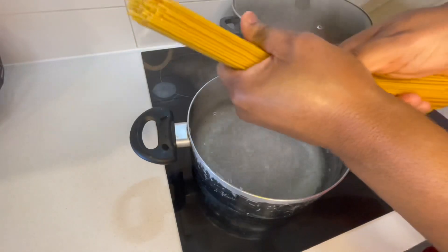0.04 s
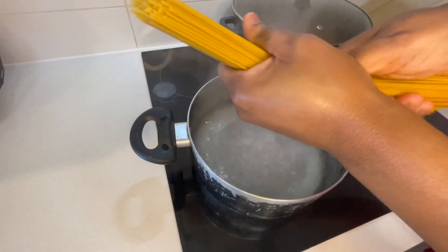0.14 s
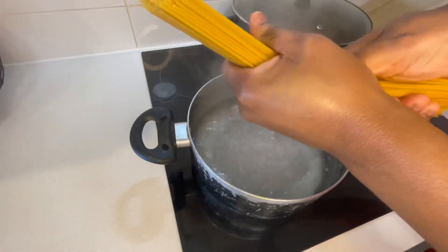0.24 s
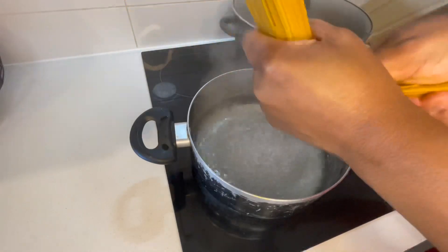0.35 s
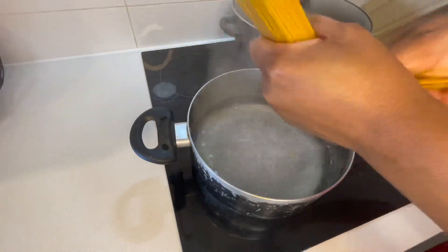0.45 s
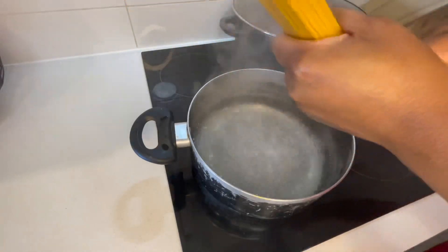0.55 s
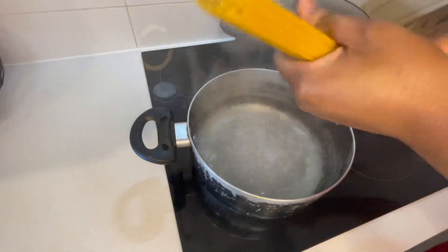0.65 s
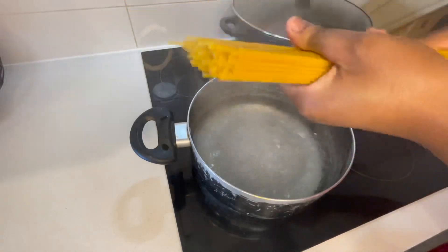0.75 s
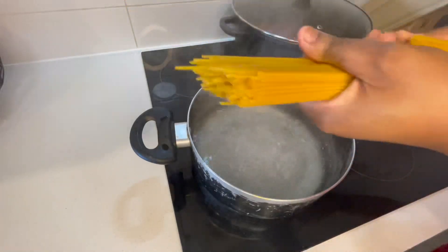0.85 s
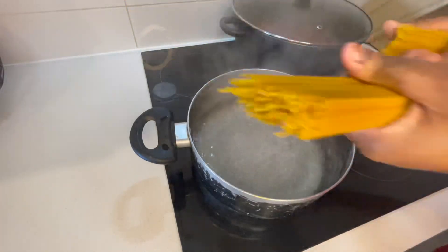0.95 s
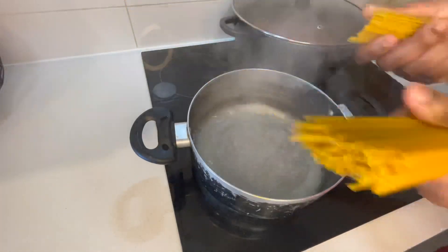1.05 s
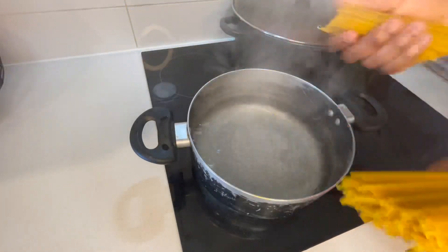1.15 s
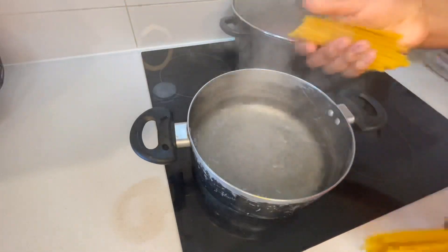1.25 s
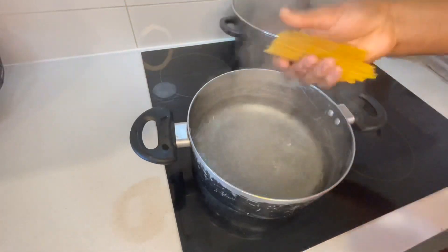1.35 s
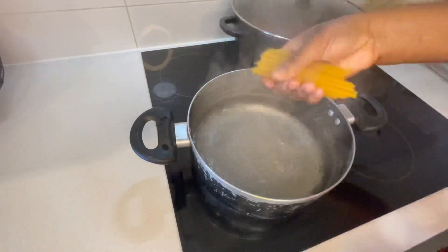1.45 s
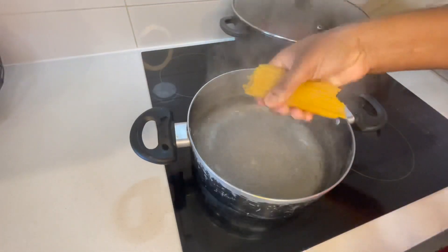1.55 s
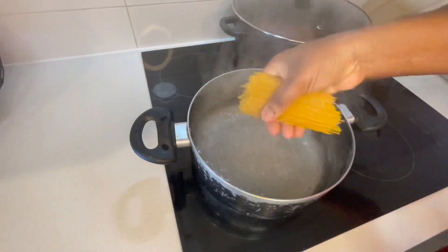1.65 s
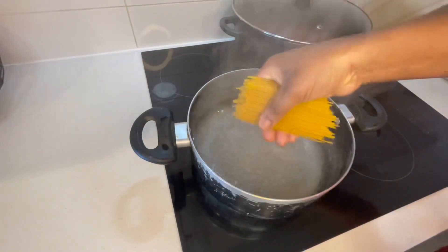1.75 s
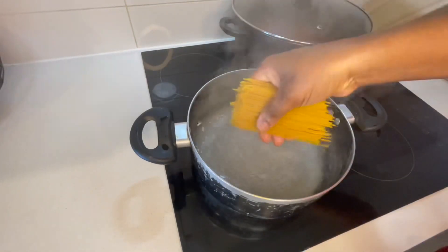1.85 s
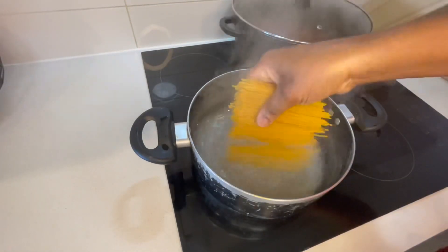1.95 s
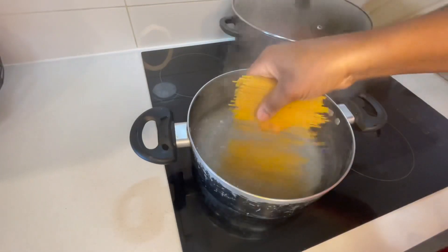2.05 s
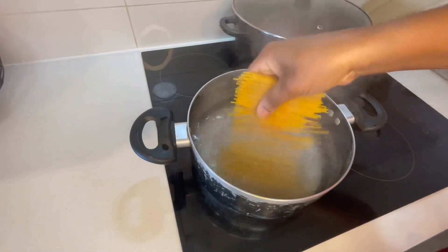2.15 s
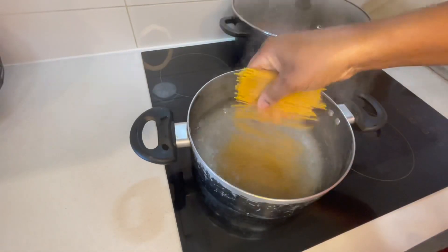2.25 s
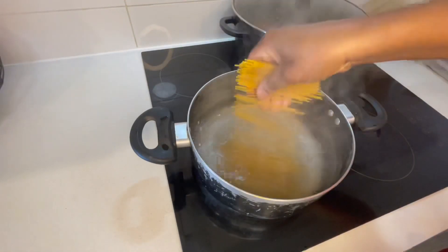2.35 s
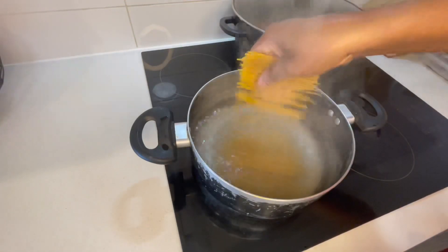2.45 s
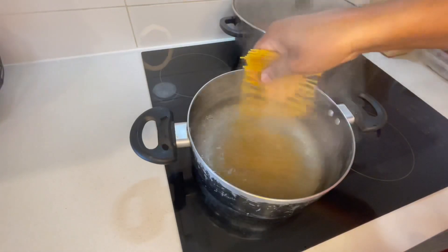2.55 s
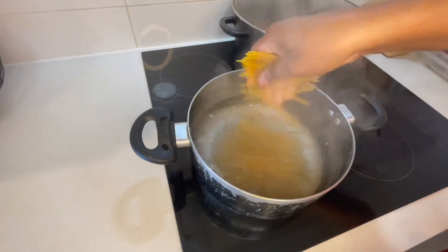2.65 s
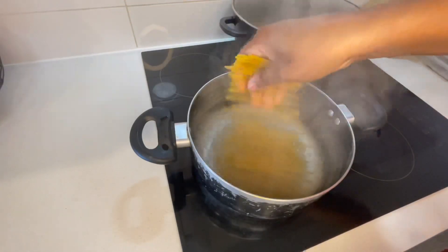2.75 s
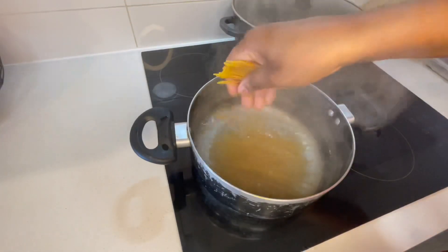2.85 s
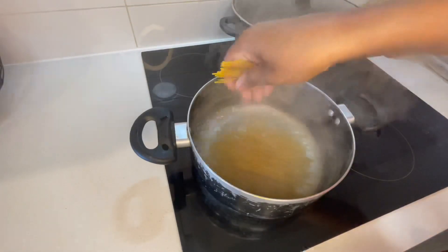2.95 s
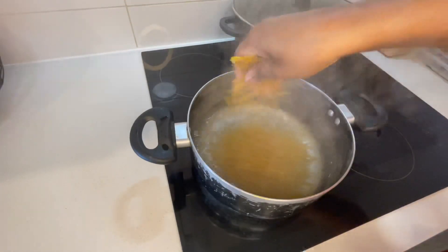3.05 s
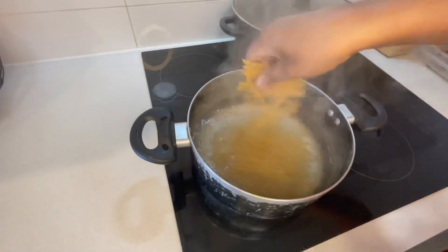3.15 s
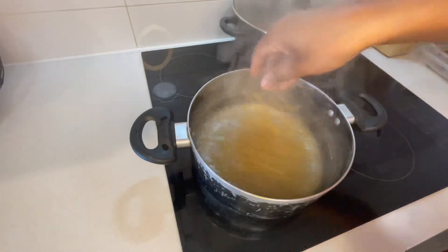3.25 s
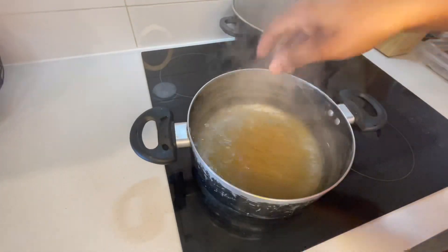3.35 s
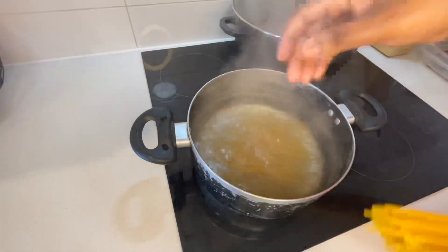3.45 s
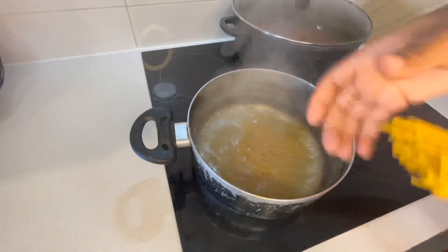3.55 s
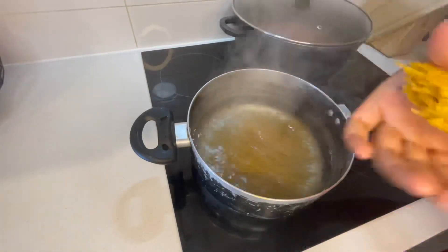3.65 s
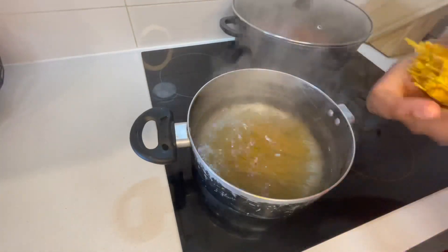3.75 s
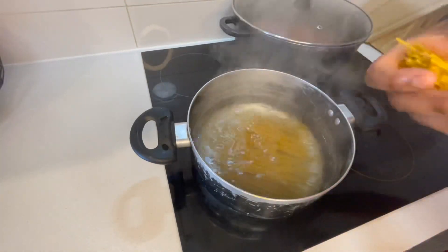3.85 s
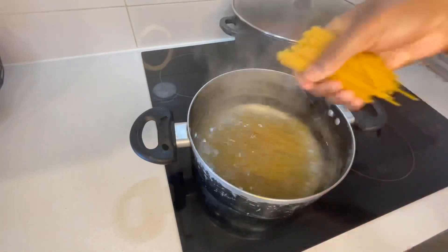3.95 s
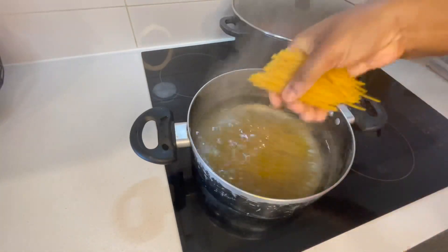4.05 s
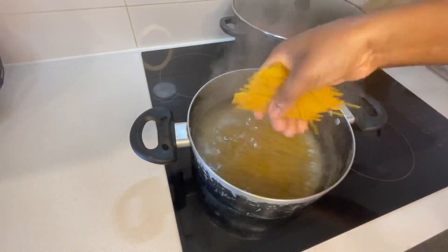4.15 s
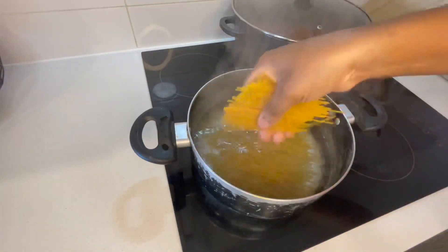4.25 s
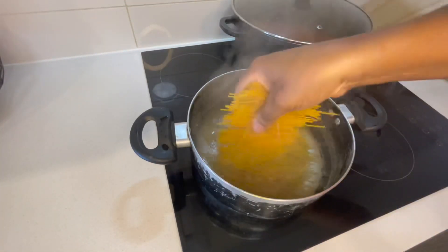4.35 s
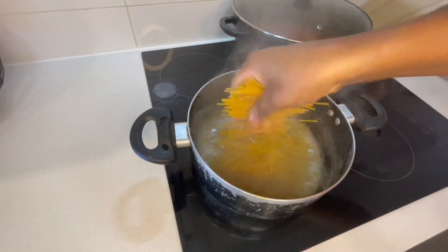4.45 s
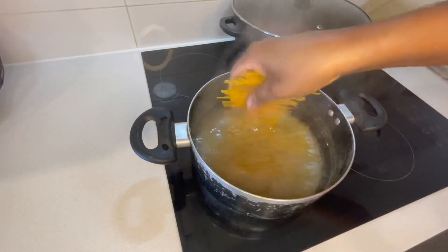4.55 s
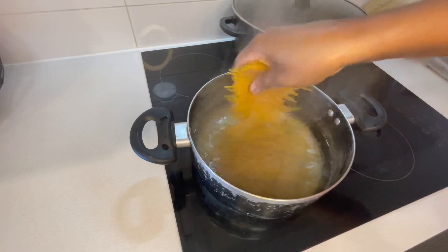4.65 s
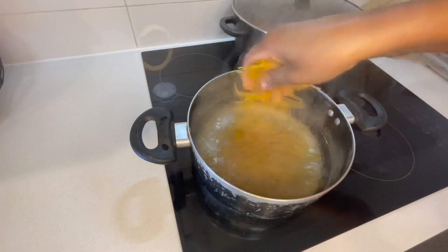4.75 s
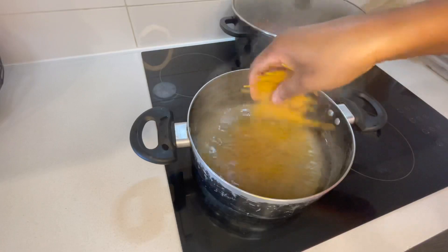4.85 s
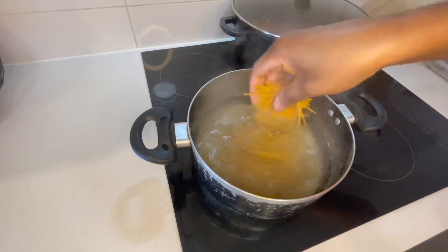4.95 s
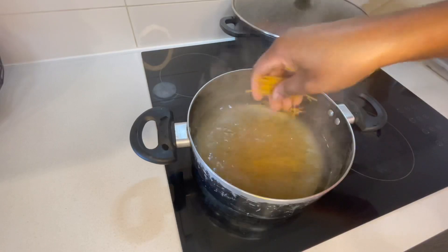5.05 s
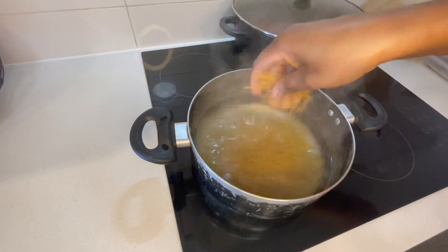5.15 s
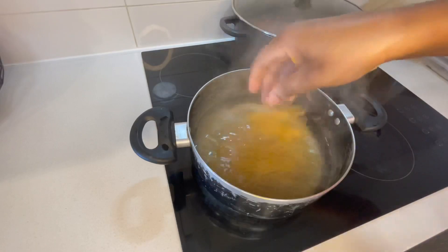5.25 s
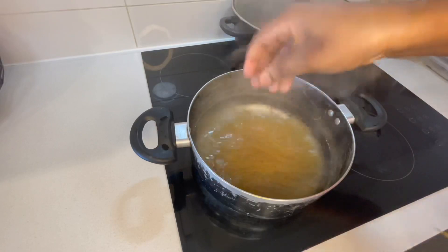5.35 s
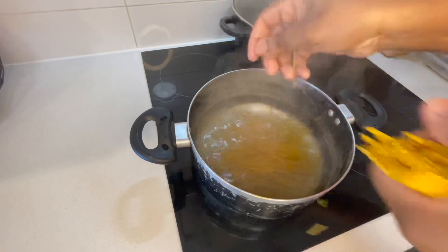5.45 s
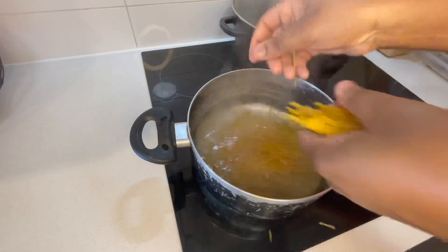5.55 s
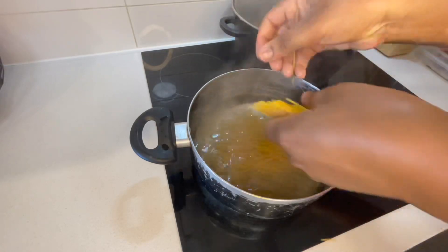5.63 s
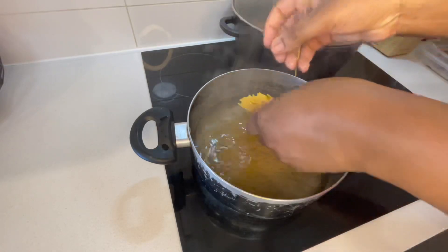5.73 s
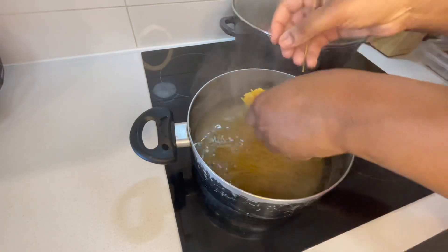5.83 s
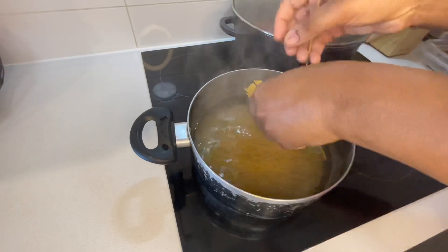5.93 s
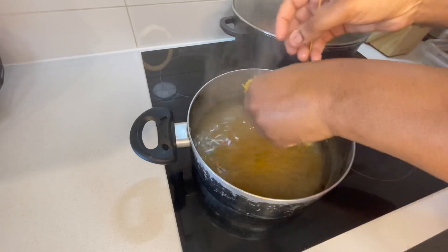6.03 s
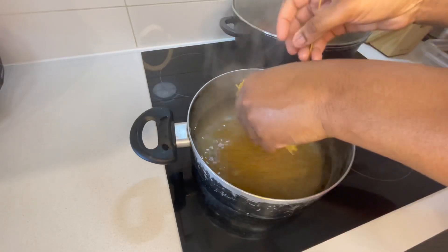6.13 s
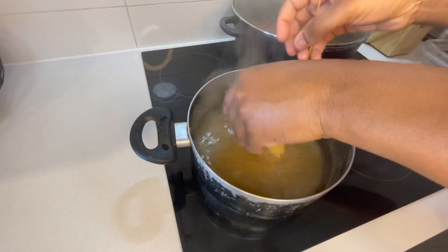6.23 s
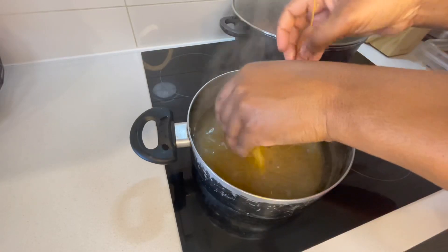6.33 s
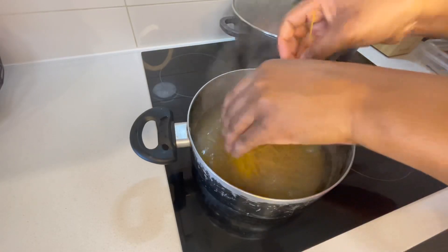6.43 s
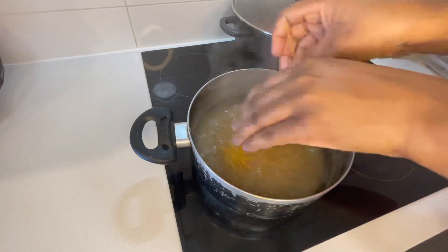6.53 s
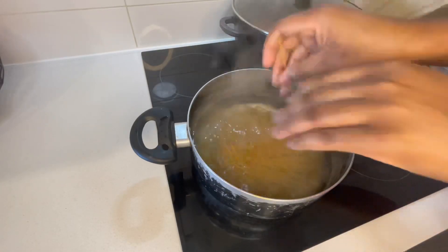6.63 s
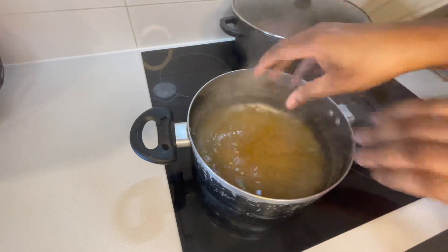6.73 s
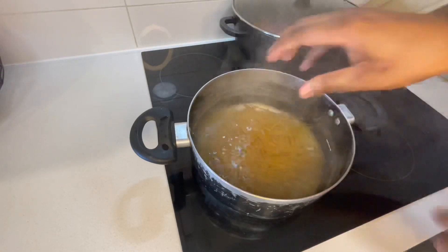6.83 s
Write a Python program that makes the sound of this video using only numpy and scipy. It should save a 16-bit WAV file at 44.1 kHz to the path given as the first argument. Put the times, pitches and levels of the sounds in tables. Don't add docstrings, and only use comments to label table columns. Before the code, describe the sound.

Close stereo in a small hard-walled kitchen: a bundle of dry spaghetti breaks at once in a loud, woody, brittle volley. After a quiet second of small ticks and steam, handfuls slide into a simmering pot, rustling, rattling and pattering on water in three waves. Falling strands stir up the soft bubbling and fizz. A faint low fan hum runs underneath.

```python
import sys
import numpy as np
from scipy import signal
from scipy.fft import rfft, irfft, next_fast_len
from scipy.io import wavfile
from scipy.ndimage import uniform_filter1d

SR = 44100
rng = np.random.default_rng(int(sys.argv[2]) if len(sys.argv) > 2 else 0)


def master(y):
    cut = np.clip(np.atleast_2d(y).T, -1, 1)
    pcm = np.round(cut * 32767)
    wavfile.write(sys.argv[1], SR, pcm.astype(np.int16))


def magnitude_from_level(level_db):
    exponent = np.asarray(level_db, float) / 20
    return 10 ** exponent


N = 303849
FLAT_ABOVE_HZ = 12000

# f/Hz, level/dB
STRAND_SIDE_DB = [(60, -14), (110, -22), (200, 4), (380, -2.5), (700, -7), (1290, -3), (2380, -7.5),
                  (4400, 1), (8120, -3.5), (15000, -1.5)]
# f/Hz, level/dB
AIR_SIDE_DB = [(60, -12), (110, -27), (200, -6), (380, -4), (700, -2.5), (1290, 0), (2380, 0), (4400, -0.5),
               (8120, -3), (15000, 2)]


def from_db(db):
    return np.exp(db * (np.log(10) / 20))


def rms_one(x):
    return x / np.sqrt(np.mean(x ** 2) + 1e-20)


def in_time(rows):
    s, *columns = np.transpose(rows)
    return [np.interp(np.arange(N) / SR, s, c) for c in columns]


def at_hz(points, hz):
    points = np.array(points)
    return np.interp(np.log(hz), np.log(np.maximum(points[:, 0], 1)), points[:, 1])


def drift(rate_hz, size=N):
    r = np.exp(-80 * np.pi * rate_hz / SR)
    white = rng.standard_normal(N // 40 + 2002)
    slow = signal.lfilter([1], [1, -2 * r, r * r], white)[2000:]
    return np.interp(np.arange(size) / 40, np.arange(len(slow)), rms_one(slow))


def resonate(x, hz, width_hz):
    r = np.exp(-np.pi * width_hz / SR)
    b = (1 - r * r) / 2
    return signal.lfilter([b, 0, -b], [1, -2 * r * np.cos(2 * np.pi * hz / SR), r * r], x)


def ports(mid, side):
    return np.array([mid + side, mid - side])


def lead(pair, shares):
    length = pair.shape[1]
    size = next_fast_len(length)
    share = at_hz(shares, np.maximum(np.fft.rfftfreq(size, 1 / SR), 1))
    early = irfft(1j * share * rfft(pair.mean(axis=0), size), size)[:length]
    return pair + ports(0 * early, early)


def coloured(spectrum, side_db):
    size = next_fast_len(N)
    hz = np.maximum(np.fft.rfftfreq(size, 1 / SR), 1)
    shape = magnitude_from_level(at_hz(spectrum, np.minimum(hz, FLAT_ABOVE_HZ))) * magnitude_from_level([0 * hz, at_hz(side_db, hz)])
    mid, side = irfft(rfft(rng.standard_normal((2, size))) * shape, size)[:, :N]
    return ports(mid, side) / np.std(mid)


def strands(spectrum, level_db, ring_db, low_db, per_s, spread_db, clump_db, cycles):
    size = len(level_db)
    hit = rng.random(size) < per_s / SR
    sizes = magnitude_from_level(spread_db * np.minimum(rng.exponential(1, size), 4)) * hit
    signs = rng.choice([-1., 1.], (2, size))
    dealt = rng.integers(0, 24, size)
    hz_all = np.geomspace(400, 15300, num=24)
    weight = magnitude_from_level(at_hz(spectrum, np.minimum(hz_all, FLAT_ABOVE_HZ))) * np.sqrt(hz_all)
    weight = weight / np.sqrt(np.sum(weight[hz_all > 4000] ** 2))
    out, clump = 0, drift(22.0, size=size)
    for k, hz in enumerate(hz_all):
        hits = sizes * signs * (dealt == k) + 1e-18
        mid, side = rms_one(resonate(resonate(hits, hz, hz / cycles), hz, 2 * hz / cycles))
        low_share = np.interp(hz, [1500, 2100], [1, 0])
        ring_share = np.interp(hz, [1500, 2100, 3400, 4600], [0, 1, 1, 0])
        clumping_db = clump_db * (clump + 1.18 * drift(14.0, size=size))
        gain = weight[k] * from_db(low_share * low_db + ring_share * ring_db + clumping_db)
        out = out + gain * ports(mid, side * magnitude_from_level(at_hz(STRAND_SIDE_DB, hz)))
    return np.pad(out * magnitude_from_level(level_db), ((0, 0), (0, N - size)))


def cracks(rows, spectrum, bright_db, body_db):
    rise_s, first_s, first_gain = 0.00052, 0.0016, 1.74
    noise, t = coloured(spectrum, STRAND_SIDE_DB), np.arange(4000) / SR
    bright, body = (rms_one(signal.sosfilt(signal.butter(2, 2300, kind, fs=SR, output="sos"), noise))
                    for kind in ("high", "low"))
    out = np.zeros((2, N))
    for s, peak_db, rel_db, pan_db, t60_s in rows:
        start = round(s * SR)
        at = slice(start, start + len(t))
        age = t[:N - start]
        rise = (1 - np.exp(-age / rise_s)) * magnitude_from_level(peak_db + pan_db * np.array([[.5], [-.5]]))
        snap = bright[:, at]
        snap = snap / np.sqrt(np.mean(snap[:, :90] ** 2))
        onset = 1 + first_gain * np.exp(-age / first_s)
        out[:, at] += rise * magnitude_from_level(bright_db - 60 * age / t60_s) * onset * snap
        out[:, at] += rise * magnitude_from_level(rel_db + body_db - 45 * age / t60_s) * body[:, at]
    return out


def snapping():
    # t/s, crackle level/dB, woody body re crackle/dB, left-right/dB
    volley_rows = [
        (0.146, -34, -12, -5),
        (0.178, -31, -17, -5),
        (0.2, -26, -13, -9),
        (0.222, -17, -8, -6),
        (0.234, -12.5, -4.5, -2),
        (0.256, -16.5, -18.5, -4),
        (0.294, -14, -2, -4),
        (0.33, -64, -14, -2),
    ]
    # t/s, peak level/dB, body re peak/dB, left-right/dB, t60/s
    crack_rows = [(0.1045, -21.5, -10.5, 1, 0.03), (0.1303, -26, -26, -10, 0.057),
                  (0.1455, -19.5, -22, -1, 0.025), (0.1526, -16.5, -35, -2, 0.078),
                  (0.149, -23, -11, 8, 0.02), (0.1595, -17, -16, 12, 0.016), (0.1636, -21, -23, -1, 0.024),
                  (0.1797, -23, -17, 8, 0.021), (0.1842, -9.5, -15, -7, 0.021),
                  (0.1963, -19.5, -16, 15.5, 0.29), (0.2044, -32, -13, -6, 0.033),
                  (0.217, -14.5, -19, 13, 0.033), (0.2262, -6, -17, -16, 0.042),
                  (0.2304, -15, -32, 10, 0.024), (0.2325, -16, -13, 7, 0.027), (0.2425, -15, -17, -2, 0.03),
                  (0.2543, -19, -6, 5, 0.0084), (0.272, -3.5, -12, -1, 0.032),
                  (0.2791, -4.5, -18, -2, 0.034), (0.2825, -9, -10, 6, 0.033),
                  (0.2878, -10.5, -14.5, 7, 0.054), (0.2955, -8.5, -8, 0, 0.036),
                  (0.2915, -5, -13, 0, 0.033), (0.3027, -13, -39, 11, 0.052)]
    # f/Hz, level per Hz/dB
    bundle_mid = [(180, -54), (300, -20.5), (810, -14.5), (863, -3), (1550, 0), (1730, 4), (2860, -6.5),
                  (8630, -4), (10100, -2), (11100, -9), (13000, -17.5)]
    # f/Hz, share
    break_lead = [(300, -.2), (700, -0.52), (2000, -0.095), (3000, -0.08), (4500, 0.062)]
    curve = [(.139, -90, 0, 0)] + list(volley_rows) + [(.36, -90, 0, 0)]
    crackle_db, body_db, pan_db = in_time(curve)
    half = SR // 2
    volley = strands(bundle_mid, crackle_db[:half] - 6.0, 0., body_db[:half] - 3.5,
                     per_s=5000, spread_db=0.0, clump_db=1.1, cycles=5.5)
    volley = volley * magnitude_from_level(np.outer([.5, -.5], pan_db))
    return lead(volley + cracks(crack_rows, bundle_mid, -9.0, -4.0), break_lead)


def tent(start_s, end_s, rise_s, fall_s):
    t = np.arange(0, N + 32, 32) / SR
    return magnitude_from_level(-20 * (np.maximum(start_s - t, 0) / rise_s + np.maximum(t - end_s, 0) / fall_s))


def falling():
    # start t/s, end t/s, rustle level/dB, patter re rustle/dB
    trickle_rows = [
        (1.869, 2.911, -51, 4),
        (3.097, 3.287, -56, 10.5),
        (4.324, 5.13, -53.5, -24),
        (5.206, 5.27, -58, -2),
        (6.018, 6.503, -51, -24),
    ]
    # peak t/s, 20 dB swell/s, 20 dB fade/s, rustle level/dB, patter re rustle/dB
    slip_rows = [(1.98, 0.2, 0.13, -44, 0.5), (2.04, 0.068, 0.12, -42.5, 7.5),
                 (2.088, 0.091, .02, -38.5, -2.5), (2.158, 0.046, 0.1, -44, 1),
                 (2.286, 0.17, 0.019, -43, -1), (2.53, 0.19, 0.092, -45, 6),
                 (2.619, 0.032, 0.039, -36.5, 3.5), (2.64, 0.03, 0.025, -48.5, 3),
                 (2.555, 0.03, 0.033, -55, 1), (2.788, 0.12, 0.029, -44, -17),
                 (2.904, 0.019, 0.022, -50, -5), (3.226, 0.0089, 0.13, -40.5, 2),
                 (3.277, 0.066, 0.019, -38, -15), (4.312, 0.13, 0.11, -55, -24),
                 (4.446, 0.075, 0.14, -41.5, 1), (4.759, 0.36, 0.078, -38.5, -6.5),
                 (4.8, 0.03, 0.04, -45, -20), (4.832, 0.066, 0.017, -37.5, -22),
                 (4.925, 0.18, 0.21, -37, -16), (5.038, 0.066, 0.063, -38, -32),
                 (5.297, 0.022, 0.058, -34.5, -29), (5.308, 0.028, 0.03, -38.5, -25),
                 (5.323, 0.03, 0.04, -43, -25), (5.337, 0.02, 0.03, -49.5, -16),
                 (5.53, 0.05, 0.051, -43.5, -10), (5.674, 0.17, .02, -56.5, -15),
                 (6.186, 0.11, 0.16, -36.5, -30), (6.272, 0.038, 0.039, -44, -49),
                 (6.37, 0.2, 0.18, -47.5, -26), (6.445, 0.18, 0.098, -40, 0)]
    edge_s = 0.021
    parts = [(tent(a, b, edge_s, edge_s), db, wet) for a, b, db, wet in trickle_rows]
    parts += [(tent(s, s, rise, fall), db, wet) for s, rise, fall, db, wet in slip_rows]
    power = sum((gain * magnitude_from_level(db)) ** 2 for gain, db, _ in parts) + 1e-12
    patter = sum((gain * magnitude_from_level(db + wet)) ** 2 for gain, db, wet in parts) + 1e-13
    return [np.interp(np.arange(N) / 32, np.arange(len(p)), 10 * np.log10(p))
            for p in (power, patter / power)]


def sliding(rustle_db, patter_db):
    # f/Hz, level per Hz/dB
    strand_mid = [(180, -23), (300, -2.5), (346, -6), (877, -8.5), (1670, -9), (3000, -1.5), (3680, -5),
                  (8900, -1), (9940, -1.5), (11100, -1.5), (13000, -24)]
    # t/s, peak level/dB, body re peak/dB, left-right/dB, t60/s
    handled_rows = [(0.002, -41.5, 1.5, 0, 0.025), (.478, -42, 1.5, -0.5, 0.054),
                    (0.6428, -41.5, -15, 10, 0.05), (0.8578, -41.5, -9, 10, 0.043),
                    (1.0898, -43.5, -8, 4, 0.12), (1.413, -44, -10, 10, 0.047), (1.5803, -39, -11, 1, 0.36),
                    (2.9016, -31, -16, 0, 0.021), (3.013, -40.5, -13, 4, 0.077),
                    (3.1405, -34.5, -30, 3, 0.032), (3.676, -42, -34, -2.5, 0.19),
                    (3.7795, -40, -17, 3, 0.053), (3.793, -37, -13, -2, 0.037),
                    (3.9143, -44, -28, 2, 0.061), (4.156, -41.5, -42, 5, 0.057),
                    (4.8296, -22.5, -32, -1, 0.016), (5.5095, -35.5, -12, 11.5, 0.1),
                    (5.619, -41, -22, 6, 0.065), (6.0112, -30, -32, 9.5, 0.047),
                    (6.7502, -37, -39, 10, 0.012), (6.8397, -49, -31, 13, 0.032)]
    # t/s, peak level/dB, body re peak/dB
    landing_rows = [(2.004, -35, -8), (2.1355, -33.5, -31), (2.159, -32.5, -34), (2.281, -42.5, -3),
                    (2.6131, -30, -11), (2.7702, -43, -8), (2.8424, -37, -31), (3.1845, -41, -22),
                    (3.217, -31.5, -16), (4.298, -46, -18), (4.313, -38.5, -14), (4.4052, -39, -6),
                    (4.7924, -29, -39), (5.08, -30.5, -43), (5.2117, -41, -28), (5.2486, -34, -21),
                    (5.293, -25, -24), (6.267, -30, -23), (6.338, -33.5, -8.5), (6.3747, -32, -20),
                    (6.449, -48, -20), (5.002, -29.5, -29)]
    # t/s, peak level/dB
    tick_rows = [(.608, -36), (.732, -47), (.743, -37.5), (.984, -36), (1.109, -37), (1.262, -40),
                 (1.543, -45), (1.675, -37), (1.835, -36.5), (2.001, -33), (2.253, -36), (2.3407, -40),
                 (2.382, -31), (2.436, -43), (2.492, -44), (2.523, -31), (2.763, -41), (2.778, -40),
                 (2.826, -38), (2.908, -31), (3.3, -30), (3.683, -41), (3.691, -35.5), (4.663, -40),
                 (4.68, -39), (4.698, -39), (4.748, -24), (4.755, -36), (4.774, -34), (4.818, -30),
                 (4.852, -42), (5.127, -35.5), (5.136, -53), (5.236, -36), (5.466, -32), (5.531, -33),
                 (5.624, -42), (6.021, -35), (6.56, -39), (6.602, -47), (6.791, -46)]
    # f/Hz, share
    rustle_lead = [(400, .05), (2000, 0.36), (3000, 0.45), (5000, 0.21), (6200, 0.15)]
    ring_db = -5.5 + 0.3 * patter_db
    rustle = strands(strand_mid, rustle_db - 1.0, ring_db + 6.0, patter_db + 4.0,
                     per_s=11000, spread_db=1.5, clump_db=1.03, cycles=6.1)
    hits = list(handled_rows)
    hits += [(*row, 0, 0.15) for row in landing_rows]
    hits += [(s, db, -9.5, 0, 0.031) for s, db in tick_rows]
    return lead(rustle + cracks(hits, strand_mid, -8.0, -1.4) + rings(), rustle_lead) + knocks()


def rings():
    # t/s, length/s, f/Hz, level/dB
    ring_rows = [(0.199, 0.025, 1730, -35), (0.245, 0.025, 1450, -37), (1.576, 0.02, 3300, -50.5),
                 (1.581, 0.037, 4700, -59), (1.574, 0.024, 3580, -63), (2.032, 0.077, 3220, -58),
                 (2.496, 0.049, 1090, -50), (2.521, 0.089, 3170, -54.5), (2.754, 0.039, 2460, -48),
                 (2.762, 0.026, 4240, -42.5), (2.819, 0.06, 2440, -52.5), (2.9, 0.019, 2500, -48.5),
                 (4.429, 0.086, 3360, -53), (4.394, 0.084, 1980, -54.5), (4.421, 0.077, 1250, -57),
                 (4.691, 0.077, 3060, -43.5), (4.774, 0.063, 2960, -41.5), (4.845, 0.017, 5000, -52),
                 (4.915, 0.031, 1980, -47), (5.275, 0.06, 2430, -51), (5.281, 0.059, 2920, -47),
                 (5.335, 0.037, 560, -49.5), (6.1, 0.017, 593, -47), (6.106, 0.13, 3040, -52),
                 (5.235, 0.13, 2320, -57), (6.17, 0.067, 3800, -54.5), (6.371, 0.024, 860, -47.5),
                 (6.42, 0.07, 1430, -52), (5.28, 0.072, 3700, -54), (4.878, 0.17, 2330, -59)]
    size = 9000
    out = np.zeros((2, N))
    for s, length_s, hz, db in ring_rows:
        width_hz = 204 + 0.022 * hz
        taps = rng.standard_normal((2, size)) * (rng.random(size) < .008)
        age = np.arange(size) / SR / length_s
        swell = np.sqrt(np.sin(np.pi * np.minimum(age, 1)) + 1e-12)
        mid, side = rms_one(resonate(resonate(taps, hz, width_hz), hz, 2.2 * width_hz)) * swell
        at = round(s * SR)
        out[:, at:at + size] += magnitude_from_level(db) * ports(mid, magnitude_from_level(-4) * side)[:, :N - at]
    return out


def knocks():
    # t/s, f/Hz, peak level/dB, t60/s
    knock_rows = [(0.048, 855, -44, 0.034), (0.2267, 1726, -13.5, 0.031), (.227, 1060, -29, 0.031),
                  (.2275, 500, -50, 0.041), (0.2282, 4130, -15, 0.029), (.2715, 1920, -17.5, 0.027),
                  (0.28, 1150, -17, 0.023), (0.2887, 1117, -18.5, 0.02), (0.289, 408, -39, 0.077),
                  (.303, 726, -30, 0.042), (.304, 367, -42, 0.037), (.985, 985, -43, 0.035),
                  (1.058, 528, -48.5, .05), (1.109, 886, -44, 0.035), (2.506, 1060, -39, .04),
                  (2.523, 1210, -41, .04), (2.624, 1200, -40, 0.023), (4.46, 1235, -39.5, 0.052),
                  (5.352, 626, -53, .06), (6.384, 1030, -47, 0.034), (5.4565, 5100, -48, 0.023),
                  (5.4565, 7360, -37, .02), (2.902, 7500, -33, .03)]
    rise_s = 0.00096
    out, age = np.zeros(N), np.arange(4000) / SR
    for s, hz, db, t60_s in knock_rows:
        at = round(s * SR)
        envelope = magnitude_from_level(db + 2 - 60 * age / t60_s) * (1 - np.exp(-age / rise_s))
        out[at:at + len(age)] += envelope * np.sin(2 * np.pi * hz * age)
    return out * magnitude_from_level([[-.4], [.4]])


def splinters():
    # t/s, peak level/dB, body re peak/dB, left-right/dB, t60/s
    thin_rows = [
        (2.662, -29, -14, 0, .04),
        (2.794, -33, -16, 0, 0.027),
        (5.135, -38, -20, 0, .03),
        (5.204, -40, -20, 3, .03),
        (5.2202, -39, -20, 0, .03),
        (5.2726, -27, -25, 0, .04),
        (5.4552, -22.5, -10, 5, 0.1),
        (5.4635, -37, -20, 3, .05),
        (6.5948, -36.5, -25, 7, 0.034),
    ]
    # f/Hz, level per Hz/dB
    thin_mid = [(300, -29), (2000, -13), (4000, -13), (4900, -1), (8500, 2), (11500, 1.5), (13000, -17.5)]
    return cracks(thin_rows, thin_mid, -9.5, -12.5)


def simmering(stir):
    # f/Hz, level per Hz/dB
    simmer_mid = [(15, -34), (25, -16), (118, 1), (172, -8), (241, -6), (351, -11.5), (604, -10),
                  (1000, -16), (1190, -15.5), (1570, -28.5), (2200, -27.5), (2860, -29.5), (4840, -120)]
    steady_db, churn_db = -55, -15.5
    water = magnitude_from_level(1.5) * coloured(simmer_mid, AIR_SIDE_DB)
    water = water + magnitude_from_level(-12.5) * bubbling() * magnitude_from_level([[.7], [-.7]])
    level = np.sqrt(magnitude_from_level(2 * steady_db) + magnitude_from_level(2 * churn_db) * stir)
    return level * magnitude_from_level(1.0 * drift(1.33)) * water


def bubbling():
    per_s = 250
    born = magnitude_from_level(4.4 * np.minimum(rng.exponential(1, N), 4)) * (rng.random(N) < per_s / SR)
    dealt = rng.integers(0, 10, N)
    pitches_hz = np.geomspace(260, 1350, num=10)
    return rms_one(sum(resonate(born * (dealt == k) + 1e-18, hz, hz / 9) for k, hz in enumerate(pitches_hz)))


def steaming(stir):
    # t/s, level/dB
    steam_curve = [(0, -50), (.12, -52), (.35, -42), (.57, -46.5), (.7, -52), (1.6, -49), (1.88, -53),
                   (2.8, -53), (3.36, -58), (4.25, -54.5), (5.15, -57.5), (5.42, -57), (5.7, -57.5),
                   (5.95, -54.5), (6.5, -54.5), (6.68, -57.5), (6.89, -58)]
    # f/Hz, level per Hz/dB
    steam_mid = [(710, -115), (1200, 1), (1620, -7), (3320, -4), (5040, -3), (9080, 0.5), (10000, -3),
                 (10500, -3.5), (11300, 0.5), (12000, -5)]
    (steam_db,), fizz_db = in_time(steam_curve), -5.5
    hiss = np.sqrt(magnitude_from_level(2 * steam_db) + magnitude_from_level(2 * fizz_db) * stir)
    return hiss * magnitude_from_level(-2.0 + 0.5 * drift(0.59)) * patchy(coloured(steam_mid, AIR_SIDE_DB), 1.1)


def patchy(pair, depth_db):
    size = next_fast_len(N)
    spectrum = rfft(pair, size)
    band = np.digitize(np.fft.rfftfreq(size, 1 / SR), np.geomspace(1500, 9000, num=8))
    return sum(from_db(depth_db * drift(12.0)) * irfft(spectrum * (band == k), size)[:, :N] for k in range(9))


def fan_hum():
    # t/s, level/dB
    load_curve = [(0, -65), (.29, -65), (.6, -55), (1.6, -71), (2.26, -51.5), (3.2, -52), (4.6, -55.5),
                  (5.3, -50.5), (5.7, -47), (6.1, -59), (6.89, -52)]
    # f/Hz, width/Hz, level/dB
    fan_modes = [(60.3, 23, -7), (93.5, 40, -3.5), (129.7, 5.4, 0.5), (243.2, 8.3, -9)]
    (load_db,) = in_time(load_curve)
    white = rng.standard_normal((2, N))
    mid, side = sum(magnitude_from_level(db + 0.44 * drift(5.6)) * rms_one(resonate(resonate(white, hz, width), hz, width))
                    for hz, width, db in fan_modes)
    return magnitude_from_level(load_db - 4.0) * ports(mid, magnitude_from_level(-25.0) * side)


def background(rustle_db):
    stir = np.abs(uniform_filter1d(from_db(2 * rustle_db), size=int(0.052 * SR)))
    return simmering(stir) + steaming(stir) + fan_hum()


def kitchen(x):
    t60_s, wall_cut_hz = 0.32, 4600
    size = next_fast_len(N + SR // 2)
    w = 2 * np.pi * np.arange(size // 2 + 1) / size
    dull = 1 / (1 + 1j * w * SR / (2 * np.pi * wall_cut_hz)) ** 0.5
    lags = (rng.uniform(.012, .04, 12) * SR).astype(int)
    out = np.zeros((2, size // 2 + 1), complex)
    for k, lag in enumerate(lags):
        loop = magnitude_from_level(-60 * lag / SR / t60_s) * dull * np.exp(-1j * w * lag)
        out[k % 2] += loop / (1 - loop) * (-1) ** (k // 2)
    return irfft(out * rfft(x, size), size)[:, :N]


def scene():
    rustle_db, patter_db = falling()
    pasta = snapping() + sliding(rustle_db, patter_db)
    return pasta + magnitude_from_level(-17.5) * kitchen(pasta) + splinters() + background(rustle_db)


def gated_top(pair):
    # low edge f/Hz, level/dB, share of time open in sum, same in difference
    top_bands = [(10330, -0.46, 0.76, 1), (10750, 0.7, 0.9, 0.77), (11300, 0.7, 0.84, 0.6),
                 (11800, 0.5, 0.72, .08), (12130, -1, 0.62, .05), (12500, -3, 0.48, .04),
                 (12920, -4, 0.2, 0.03), (13400, -5, .07, .02), (13900, -5, .08, .02),
                 (14300, -5, .08, 0.02), (14700, -4, 0.11, 0.02), (15100, -5, 0.09, .02),
                 (15450, -6, .06, .02), (15800, -90, .01, .01)]
    shut_above_db, shut_hz = -27, (12900, 11700)
    sudden_db = 9.5
    size = next_fast_len(N)
    spectrum, hz = rfft(pair, size), np.fft.rfftfreq(size, 1 / SR)
    out = irfft(spectrum * (hz < top_bands[0][0]), size)[:, :N]
    shut = uniform_filter1d(pair[0] ** 2, size=1500)[::128] > magnitude_from_level(2 * shut_above_db)
    shut = np.convolve(shut, np.ones(40))[:len(shut)] > 0
    treble = irfft(spectrum[0] * (hz > 4000), size)[:N] ** 2
    before = np.roll(uniform_filter1d(treble, size=1024), 600)[::128]
    sudden = uniform_filter1d(treble, size=128)[::128] > magnitude_from_level(2 * sudden_db) * before
    sudden = np.convolve(sudden, np.ones(3), "same") > 0
    sudden = sudden * np.array([[True], [False]])
    frame = np.clip((np.arange(len(shut)) + 1) // 8 * 8 + 3, 0, len(shut) - 1)
    for (low_hz, db, *shares), (high_hz, *_) in zip(top_bands, top_bands[1:]):
        band = irfft(spectrum * ((hz >= low_hz) & (hz < high_hz)), size)[:, :N]
        level_db = 10 * np.log10(uniform_filter1d(band ** 2, size=1024)[:, ::128] + 1e-14)
        if low_hz > shut_hz[0]:
            level_db = np.minimum(level_db, np.quantile(level_db, .55, axis=1)[:, None])
        level_db = level_db + max(1.3, 0.6 - 0.67 * db) * drift(12)[::128]
        limit_db = [[np.quantile(row, 1 - np.clip(share, 0, 1))] for row, share in zip(level_db, shares)]
        passed = (level_db > limit_db)[:, frame] | sudden
        passed = passed & ~(shut & (low_hz > np.array(shut_hz)[:, None]))
        gate = np.repeat(1. * passed, 128, axis=1)[:, :N]
        out += magnitude_from_level(db) * band * uniform_filter1d(uniform_filter1d(gate, size=128), size=128)
    return out


def low_pass(x):
    return signal.sosfilt(signal.butter(12, 16450, fs=SR, output="sos"), x)


def record(dry):
    # f/Hz, share
    port_lead = [(7500, -0.15), (9000, 0.24), (9800, -0.78), (10400, 0.95), (11700, -0.56), (13500, 0.36)]
    dip_hz, dip_share, dip_width_hz = 7500, 0.53, 2100
    null_hz, lift_hz, lift_width_hz, lift_db = (9850, 10252), 10230, 770, 9.5
    size = next_fast_len(N)
    hz = np.fft.rfftfreq(size, 1 / SR)
    shade = 1 - dip_share / (1 + ((hz - dip_hz) / dip_width_hz) ** 2)
    pair = np.array([dry[0] * magnitude_from_level(0.25), irfft(shade * rfft(dry[1], size), size)[:N]])
    left, right = lead(.72 * np.tanh(pair / .72), port_lead)
    mid, side = (left + right) / 2, (left - right) / 2
    mid = signal.sosfilt(signal.cheby2(4, 40, null_hz, "stop", fs=SR, output="sos"), mid)
    side = side + (magnitude_from_level(lift_db) - 1) * resonate(side, lift_hz, lift_width_hz)
    mix = ports(*gated_top(np.array([mid, side])))
    return low_pass(mix)


dry = scene()
out = record(dry)
master(out)
```